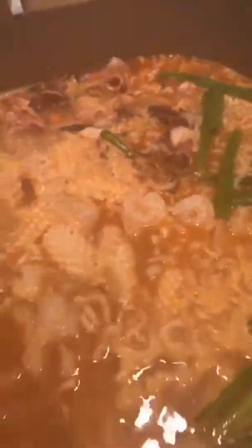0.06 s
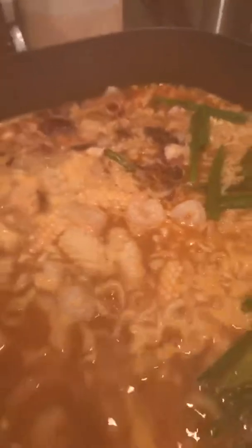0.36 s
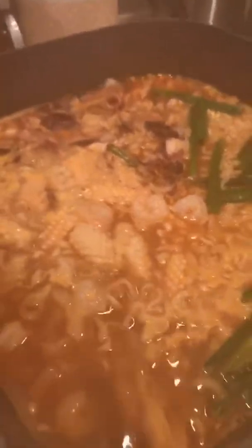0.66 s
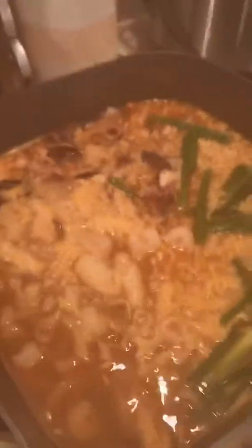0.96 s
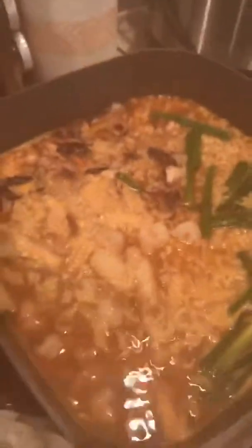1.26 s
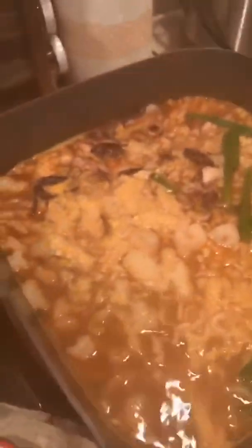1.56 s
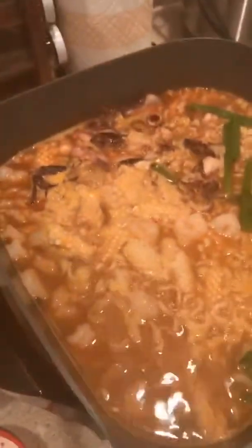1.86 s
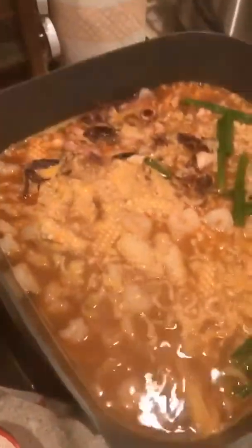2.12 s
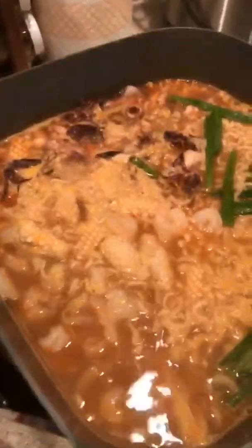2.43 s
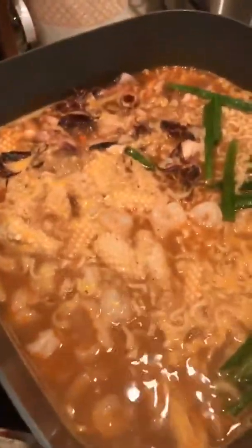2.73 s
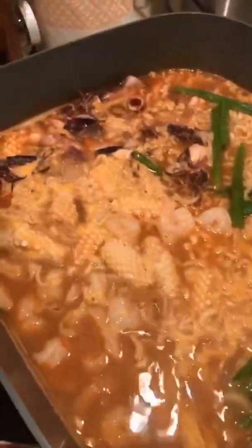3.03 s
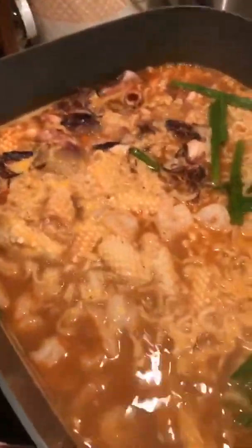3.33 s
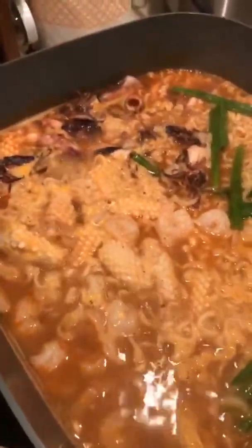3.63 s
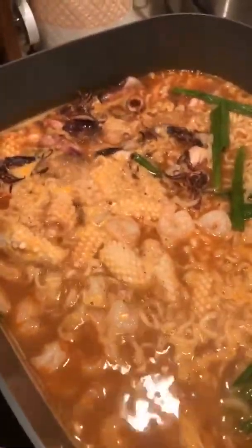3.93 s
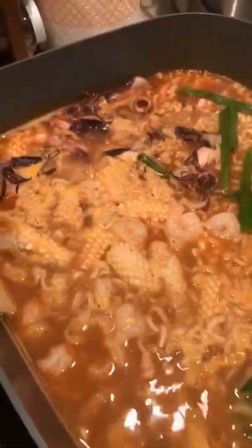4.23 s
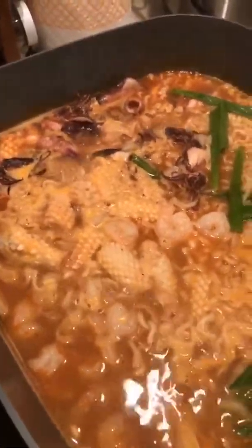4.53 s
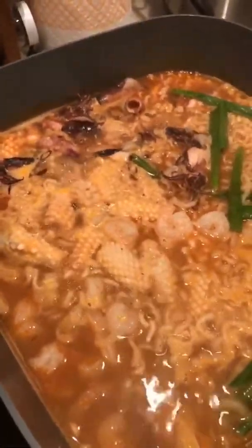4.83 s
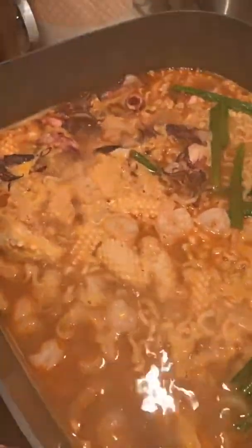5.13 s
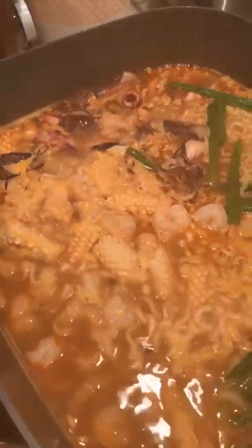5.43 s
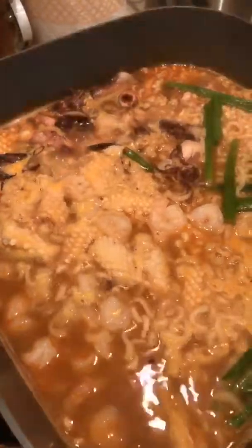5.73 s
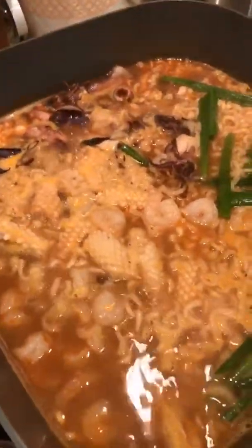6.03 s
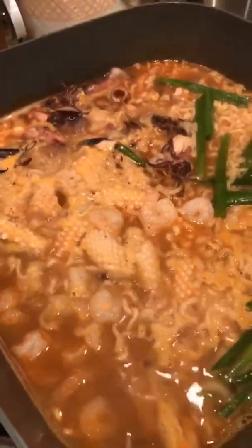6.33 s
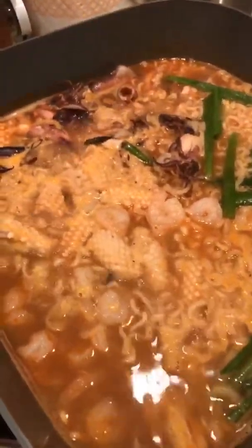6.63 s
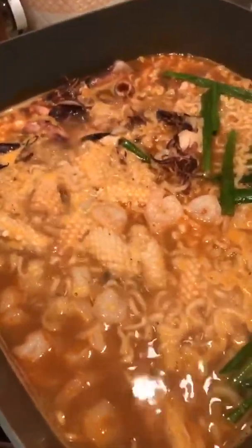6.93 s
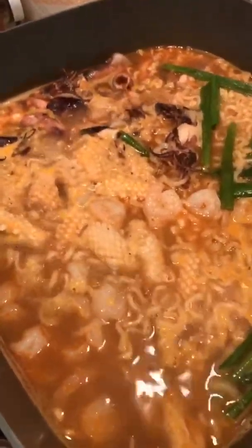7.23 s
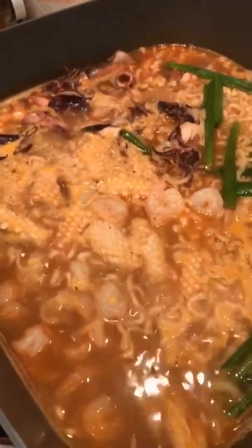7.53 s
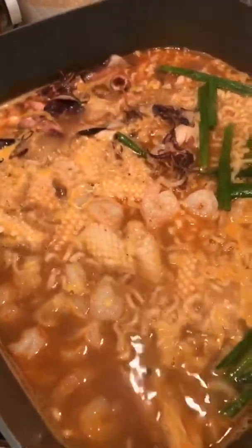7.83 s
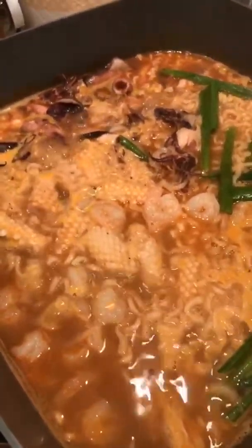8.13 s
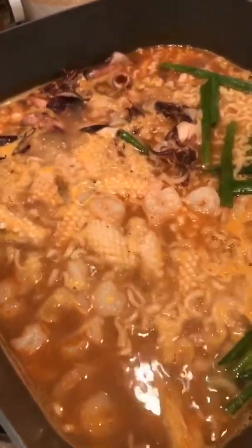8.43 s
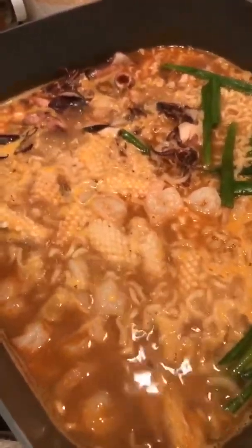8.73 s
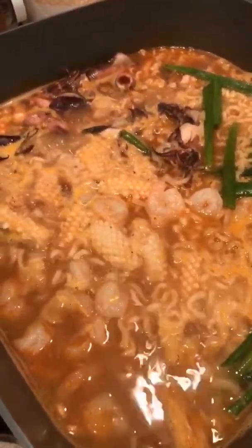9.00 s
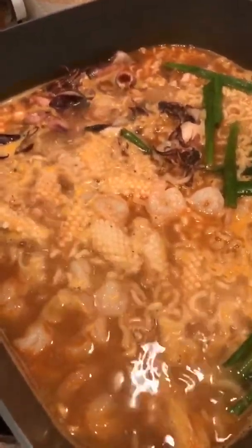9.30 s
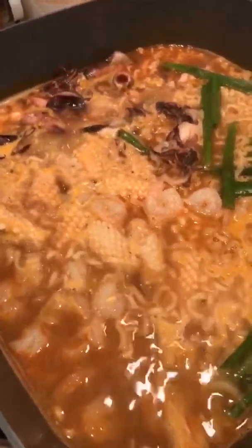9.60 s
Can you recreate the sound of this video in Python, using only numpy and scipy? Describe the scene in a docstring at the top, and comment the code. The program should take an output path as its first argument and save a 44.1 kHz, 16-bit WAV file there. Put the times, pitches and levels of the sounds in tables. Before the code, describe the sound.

Noodle soup simmers in a pan for the whole ten seconds, heard from just above it in a kitchen with little echo. Countless tiny bubbles burst in a fine, wet crackle over a soft hiss, with small plops and bright spitting ticks scattered irregularly throughout. Underneath, an extractor fan gives a steady low hum and a faint rush of air. At about 1 second a hand bumps the microphone: a loud, deep, dull thump made of several quick knocks, by far the loudest sound, dying away in a low rumble by about 1.6 seconds. The simmering continues at an even level. A tiny sizzle comes at around 2.3 seconds, a faint low bump at about 3.3 seconds, and a small sharp pop of steam near 7.8 seconds. The bubbling and the fan carry on unchanged to the end.

```python
"""Noodle soup simmers in a pan, heard from a hand-held camera just above it.
Countless small bubbles burst over a soft hiss; larger ones plop, and now and then a drop spits or sizzles.
About a second in, the hand shifts its grip and bumps the camera with a loud, dull thump; the camera
rocks to rest. Behind it all an extractor fan hums, its air rushing through the hood."""
import sys
import numpy as np
from scipy import signal
from scipy.fft import rfft, irfft, next_fast_len
from scipy.io import wavfile

SR = 44100
rng = np.random.default_rng(int(sys.argv[2]) if len(sys.argv) > 2 else 0)


def file_out(sig):
    """Save sig as 16-bit WAV at sys.argv[1]."""
    # one column per channel
    cols = np.atleast_2d(sig).T
    # limit, then scale
    lim = np.clip(cols, -1, 1)
    pcm = np.round(lim * 32767).astype(np.int16)
    wavfile.write(sys.argv[1], SR, pcm)


N = 434826
TIME = np.arange(N) / SR

# Crowds of bubbles, large to tiny. Each row: pitch in Hz, bursts a second, level in dB.
BUBBLE_CROWDS = [(1058, 82, -69), (1680, 270, -62), (3210, 400, -63), (4460, 170, -68), (5800, 110, -74.5),
                 (9200, 200, -83), (13800, 340, -72.5)]
# Hiss of the finest bubbles. Each row: frequency in Hz, level in dB.
HISS_SPECTRUM = [(500, -20), (1100, 3), (1700, 7), (2500, 0.5), (3300, 3.5), (4200, 1), (5000, -5),
                 (6000, -1.5), (7200, -10.5), (10000, -11.5), (11000, -49), (15000, -28)]
# Strength of the boil. Each row: time in seconds, gain in dB.
BOIL_RIDE = [(0, 1), (.85, -2), (1.15, -1.3), (2, -2), (4, -0.5), (8.7, -1.9), (9.86, -0.5)]
# Big bubbles and deep, slow ones. Each row: start in seconds, level in dB, pitch in Hz, cycles to the crest.
PLOP_CUES = [(0.7199, -37, 4290, .8), (0.882, -45, 3810, 0.99), (1.0179, -34.5, 3050, 1.9),
             (1.6723, -33, 3580, 1.5), (1.831, -45, 1660, 1.2), (1.956, -33, 1300, 0.44),
             (2.208, -38, 3030, 1.4), (2.267, -41, 2830, 1.6), (2.4073, -37, 1780, 0.77),
             (2.5123, -38, 2010, 1.2), (2.5745, -42, 2670, 1.9), (2.6173, -32.5, 1920, 0.77),
             (2.706, -41, 1690, 1.2), (2.716, -45, 3500, 1.8), (2.952, -35.5, 2150, .9),
             (3.008, -37, 1890, 1.8), (3.3667, -40, 3960, 1.4), (3.4445, -37, 2980, 1.1),
             (3.4714, -36.5, 1400, 1.5), (3.843, -34.5, 2900, 2.2), (3.963, -33, 2100, 0.74),
             (4.2845, -34.5, 2920, 0.91), (4.385, -39, 1630, 0.9), (4.43, -46, 1670, .8),
             (4.4838, -47, 1490, .8), (4.507, -39.5, 3800, 1.8), (4.561, -40, 1940, 1.8),
             (4.692, -39, 2830, 1.6), (4.752, -38, 1710, .9), (5.094, -36, 3400, 1.3),
             (5.438, -39, 1660, 1.2), (5.664, -32.5, 1930, 0.57), (6.0252, -39, 1880, 1),
             (6.213, -42, 1720, 1.3), (6.293, -41, 1880, 0.92), (6.554, -37, 1860, 0.71),
             (6.6028, -35, 4070, 1.3), (6.636, -35, 2010, 1.1), (6.662, -36.5, 3340, 1.1),
             (6.7307, -35.5, 1950, 2.1), (7.042, -38, 1530, 0.49), (7.057, -34.5, 3870, 1.2),
             (7.207, -36, 3470, 0.81), (7.2555, -33.5, 2920, 1.1), (7.4853, -36, 3250, 1),
             (7.692, -30, 3320, 1.3), (7.8679, -31.5, 2980, 1.5), (7.977, -31.5, 3830, 1),
             (8.584, -39, 1900, 1.7), (8.6465, -38, 1740, .6), (8.7745, -34, 3550, .9),
             (8.839, -35.5, 3450, 1.3), (9.063, -36, 1540, 0.81), (9.4553, -37, 3340, 1.2),
             (9.557, -32, 1910, .6), (9.6264, -43, 3290, 1.3), (9.749, -40, 2930, 2.7),
             (9.767, -34, 1460, 1.9)]
BLUP_CUES = [(1.955, -54, 884, 1.4), (3.085, -55, 605, 1.2), (3.469, -45, 910, 1.3),
             (4.253, -43, 696, 0.89), (5.323, -44, 633, 1)]
# Spitting drops. Each row: start in seconds, level in dB, centre of the tick's colour in Hz.
SPIT_CUES = [(1.065, -39, 9000), (1.6077, -45, 8000), (1.6631, -43, 8600), (1.693, -42, 8400),
             (1.732, -38, 8500), (1.8357, -42, 10000), (2.14, -39.5, 9000), (2.2194, -34, 8500),
             (2.5616, -45, 11000), (2.6194, -41, 13000), (2.9447, -42, 13000), (3.4321, -48, 11000),
             (3.83, -32.5, 9500), (3.9659, -40, 11000), (4.0297, -44, 11000), (4.2845, -49, 5500),
             (4.6548, -44, 13000), (4.7435, -40, 12500), (4.8204, -39, 12000), (4.935, -42, 13000),
             (5.0868, -43, 8000), (5.0945, -43, 7000), (5.2809, -41, 10000), (5.2994, -40, 11000),
             (5.9878, -46, 11000), (6.3964, -44, 7960), (6.5535, -42, 11000), (6.9386, -42, 12500),
             (6.9541, -37, 11500), (7.2569, -51, 14000), (7.6962, -39, 13000), (7.856, -39, 9000),
             (8.6457, -33.5, 9500), (8.6697, -39, 11000), (8.839, -50, 5500), (9.1775, -43, 11000),
             (9.319, -38, 9400), (9.4544, -43, 11000), (9.511, -39, 12500), (9.558, -50, 5000),
             (9.6405, -40, 11000)]
# Colour of spits and spray. Each row: frequency in Hz, level in dB.
SPIT_SPECTRUM = [(1500, -25), (4000, 6), (6500, 4.5), (9000, 0), (12000, -0.5), (15500, 2.5)]
# Collapsing froth. Each row: start in seconds, level in dB.
FIZZ_CUES = [(0.786, -61), (.817, -54), (.868, -55.5), (6.634, -60), (7.045, -61), (7.204, -62)]
# Steam off hot metal. Each row: frequency in Hz, level in dB.
STEAM_SPECTRUM = [(300, -4), (700, 0), (1200, 0), (2000, 0), (3500, 0), (6000, -3), (9000, -5), (15000, -5)]
# The pan wall rings under a sizzle and a pop. Each row: pitch in Hz, level in dB, seconds to fall 60 dB.
WALL_SIZZLE_MODES = [(1120, -46, .045), (1405, -43, .06), (3800, -48, .09), (4301, -49, .1),
                     (7150, -49, .1)]
WALL_POP_MODES = [(1930, -27.5, 0.0082), (2920, -21, 0.0021), (2950, -48, .05), (3930, -29, 0.0028),
                  (5660, -31, 0.0065), (11800, -30.5, 0.0032), (14800, -30, 0.0029)]
# Resonances of the air in the pan. Each row: centre in Hz, width in Hz, gain of the added band in dB.
PAN_RESONANCES = [(936, 114, 2), (1740, 1500, -13), (3150, 400, -8.5), (4270, 170, -15)]
# The hand bumps the camera.
# Each row: start in seconds, boom level in dB, boom pitch in Hz, thud gain in dB, knock gain in dB.
BUMP_CUES = [(1.044, -37, 60, -29, -42), (1.0522, -10, 24, -14, -18), (1.0793, -7, 55, -12.5, -28),
             (1.0963, -5, 48, -22, -44), (1.1115, -9, 47, -10, -10), (1.1316, -31, 41.8, -15, -13),
             (1.139, -32, 42, -11, -28), (1.1498, -12.5, 47, -9.5, -15), (1.1747, -14, 66, -16.5, -19.5),
             (1.2045, -30, 68, -25, -41), (1.2329, -19, 85, -16.5, -22), (1.2484, -39, 65, -24, -29),
             (1.2666, -18, 62, -17, -30), (1.2833, -19, 55, -23, -30), (1.3303, -15.5, 56.8, -30, -56),
             (1.388, -31, 50.4, -38, -70), (1.526, -27, 49.7, -46, -70), (3.29, -32, 53.7, -54, -66)]
# The camera's body thuds, its shell knocks. Each row: pitch in Hz, level in dB, seconds to fall 60 dB.
BODY_MODES = [(105, -4.5, 0.089), (135, -3.5, 0.16), (168, -4, .075), (206.5, -4, 0.076), (327, -7, 0.08)]
SHELL_MODES = [(488, -0.5, 0.014), (745, -10, 0.018), (982, -7.5, .014), (1206, -9, 0.01),
               (1670, -15.5, 0.0066)]
# Skin scuffing the shell. Each row: frequency in Hz, level in dB.
SCUFF_SPECTRUM = [(150, -9), (400, 5), (700, 4), (1050, -4.5), (1500, -16), (2200, -29), (4000, -64)]
# The camera's move over the pan. Each row: time in seconds, gain of the wall's echo, treble gain in dB.
CAMERA_PATH = [(0, 0.099, -1.5), (.5, 0.41, 0), (.85, 0.19, 2), (1.08, 0, -1.5), (1.5, 0.016, -1.5),
               (1.68, 0.035, 0.5), (9.86, .04, -0.26)]
# Hum of the fan. Each row: multiple of the motor speed, level in dB.
MOTOR_HARMONICS = [(1, -38), (5, -57), (6, -56.5), (7, -52), (8, -85), (9, -66.5), (10, -67), (11, -66.5),
                   (14, -76), (18, -73.5)]
# Rush of the fan's air. Each row: frequency in Hz, level in dB.
AIR_SPECTRUM = [(15, -16), (45, 3), (95, 2), (140, -7.5), (210, -2.5), (300, -2), (400, -6.5), (470, -5),
                (560, -11), (730, -12), (930, -10.5), (1250, -21), (2500, -21.5), (8000, -40)]
# Drone of the hood, stirred by the air. Each row: centre in Hz, width in Hz, level in dB.
HOOD_RESONANCES = [(30, 13, -52.5), (244.2, 10.5, -62), (282, 8, -56), (365.6, 16, -61), (665, 16, -70.5)]
# The kitchen's tail. Each row: frequency in Hz, seconds to fall 60 dB.
KITCHEN_DECAY = [(200, 0.18), (2000, 0.26), (6000, 0.076), (15000, 0.18)]


def simmer(spread_db=5.0, clump=.3, hiss_db=-60, flicker_db=2.57):
    """Bubbles of every size burst in clumps over a flickering hiss; a few are much louder than the rest."""
    surge = drift(35)
    busy = np.exp(clump * surge)
    out = gain_of(hiss_db + flicker_db * surge) * coloured(HISS_SPECTRUM)
    for hz, per_s, db in BUBBLE_CROWDS:
        crowd = np.zeros(N)
        # thick broth damps each ring within a few cycles
        rings = [bubble(hz * np.exp(rng.uniform(-.25, .25)), rng.uniform(.5, 1.5)) for _ in range(48)]
        when, size, kind = rng.random((7000, 3))[:int(per_s * N / SR)].T
        starts = np.searchsorted(np.cumsum(busy) / busy.sum(), when) / SR
        heights = gain_of(spread_db * np.minimum(-np.log(1 - size), 3.8))
        for s, height, pick in zip(starts, heights, kind):
            add(crowd, s, height * rings[int(pick * len(rings))])
        out += gain_of(db) * unit_rms(crowd)
    return out * gain_of(curve(BOIL_RIDE)[0])


def bubble(hz, cycles, glide=0.035):
    """A bursting bubble's cavity swells into a short ring, rising a little as it opens."""
    turns = hz * TIME[:1500]
    age = turns / max(cycles, .3)
    swell = (age * np.exp(1 - age)) ** 1.4
    return swell * np.sin(2 * np.pi * turns * (1 + glide * np.tanh(age / 6)))


def plops(plop_db=-2.5, splash_db=-18, daughter_db=-11, daughter_s=.012):
    """Large bubbles plop, their torn skin splashes back and traps a smaller bubble; deep ones blup."""
    out = np.zeros(N)
    for s, db, hz, cycles in PLOP_CUES:
        add(out, s, gain_of(db + plop_db) * bubble(hz, cycles))
        add(out, s, gain_of(db + splash_db) * puff(HISS_SPECTRUM, 0.00082, 0.0032))
        delay, pitch = rng.random(2)
        daughter = bubble(hz * (1.15 + .6 * pitch), cycles)
        add(out, s + daughter_s * delay, gain_of(db + daughter_db) * daughter)
    for s, db, hz, cycles in BLUP_CUES:
        add(out, s, gain_of(db) * bubble(hz, cycles))
    return out


def spits(spit_db=-8.0, rise_s=0.00094, fall_s=0.0014, focus_db=9, droplet_db=-11, scatter_s=.028):
    """Each drop spits with a bright tick, pitched by its size, and three droplets spatter after it."""
    out = np.zeros(N)
    for s, db, hz in SPIT_CUES:
        colour = [(f, level - focus_db * np.log2(f / hz) ** 2) for f, level in SPIT_SPECTRUM]
        add(out, s, gain_of(db + spit_db) * puff(colour, rise_s, fall_s))
        for delay, size in rng.random((3, 2)):
            droplet = 2 * size * puff(colour, rise_s / 2, fall_s / 2)
            add(out, s + scatter_s * delay, gain_of(db + spit_db + droplet_db) * droplet)
    return out


def spray(db=-71, per_s=45, spread_db=12.5):
    """A fine spray from the bursting bubbles ticks faintly across the whole treble."""
    when, size = rng.random((2000, 2))[:int(per_s * N / SR)].T
    drops = np.zeros(N)
    drops[(when * N).astype(int)] = gain_of(spread_db * np.minimum(-np.log(1 - size), 3))
    tick = strike(TIME[:1000], rise_s=0.0012, fall_s=0.0042)
    envelope = signal.oaconvolve(drops, tick)[:N]
    return gain_of(db + curve(BOIL_RIDE)[0]) * unit_rms(envelope * coloured(SPIT_SPECTRUM))


def fizzes(hz=4000, length_s=.017, count=8):
    """A patch of froth collapses: a handful of like bubbles burst almost together."""
    out = np.zeros(N)
    for s, db in FIZZ_CUES:
        patch = np.zeros(3000)
        for when, pitch in rng.random((count, 2)):
            add(patch, when * length_s, bubble(hz * (.85 + .3 * pitch), cycles=1.6))
        add(out, s, gain_of(db) * patch / np.linalg.norm(patch) * np.sqrt(length_s * SR))
    return out


def sizzle(start_s=2.2767, db=-41.0, grain_db=1.5):
    """A splash rings the hot wall and boils away in a crackling blink."""
    out = np.zeros(N)
    steam = puff(STEAM_SPECTRUM, rise_s=.001, fall_s=0.018)
    crackle = unit_rms(gain_of(grain_db * drift(400, len(steam))))
    wall = ring(WALL_SIZZLE_MODES, contact_s=.0005, size=len(steam))
    add(out, start_s, gain_of(db) * steam * crackle + wall)
    return out


def pop(start_s=7.7537, low_cut_hz=1400):
    """One pocket of steam snaps against the pan; it is too small to radiate any bass."""
    out = np.zeros(N)
    low_cut = signal.butter(3, low_cut_hz, "high", fs=SR, output="sos")
    add(out, start_s, signal.sosfilt(low_cut, ring(WALL_POP_MODES, contact_s=.00003)))
    return out


def pan(x, trim_db=-2):
    """The hollow of the pan lifts a few bands of the soup's sound."""
    bands = sum(gain_of(db) * signal.lfilter(*signal.iirpeak(hz, hz / width, fs=SR), x)
                for hz, width, db in PAN_RESONANCES)
    return gain_of(trim_db) * (x + bands)


def handling(scuff_db=-17, rock_start_s=1, rock_hz=43.24, rock_db=-21.5, rock_t60_s=2):
    """Each bump swings the camera, thuds its body, knocks and scuffs its shell; then it rocks to rest."""
    out, swing = np.zeros(N), np.zeros(N)
    thud = ring(BODY_MODES, contact_s=0.0013)
    knock = ring(SHELL_MODES, contact_s=0.00078)
    for s, boom_db, _, thud_db, knock_db in BUMP_CUES:
        add(swing, s, gain_of(boom_db) * strike(TIME[:SR // 2], rise_s=0.0044, fall_s=0.016))
        add(out, s, gain_of(thud_db) * thud + gain_of(knock_db) * knock)
        add(out, s, gain_of(knock_db + scuff_db) * puff(SCUFF_SPECTRUM, 0.0013, 0.016))
    # the rocking is one deep ring that beats against the fan's hum
    add(out, rock_start_s, ring([(rock_hz, rock_db, rock_t60_s)], contact_s=.03, size=SR))
    boom_hz = curve(BUMP_CUES)[1]
    boom = swing * np.sin(2 * np.pi * np.cumsum(boom_hz * (swing > 0)) / SR)
    return out + boom


def fan(motor_hz=58.36, waver=0.00071, flutter=0.17, air_db=-49):
    """Motor tones, the upper ones fluttering in the draught, over rushing air and a droning hood."""
    turns = np.cumsum(motor_hz * (1 + waver * drift(1.55))) / SR
    out = gain_of(air_db) * coloured(AIR_SPECTRUM)
    for multiple, db in MOTOR_HARMONICS:
        sway = 1 + flutter * drift(2.7) if multiple > 2 else 1
        tone = np.sin(2 * np.pi * (multiple * turns + rng.random()))
        out += np.sqrt(2) * gain_of(db) * sway * tone
    for centre, width, db in HOOD_RESONANCES:
        out += gain_of(db) * noise(lambda hz: 1 / (1 + (2 * (hz - centre) / width) ** 2))
    return out


def over_pan(x, echo_s=0.00022, rim_hz=2500, wall_hz=5000):
    """The wall's echo hollows the sound while the camera is low; the rim dulls it as it pulls back."""
    echo, treble_db = curve(CAMERA_PATH)
    reflected = signal.sosfilt(signal.butter(1, [200, wall_hz], "band", fs=SR, output="sos"), x)
    x = x + echo * np.interp(TIME - echo_s, TIME, reflected)
    low = signal.sosfiltfilt(signal.butter(2, rim_hz, fs=SR, output="sos"), x)
    return low + gain_of(treble_db) * (x - low)


def kitchen(x, wet_db=-9.5, near_gain=.25, echoes_per_s=3000):
    """Six close echoes off the pan and hob, then a short, faint tail that lingers most in the mids."""
    size = SR // 2
    taps = rng.choice([-1., 1.], size) * (rng.random(size) < echoes_per_s / SR) * (TIME[:size] > .004)
    hz, t, spectra = signal.stft(taps, SR, nperseg=256)
    decay = np.exp(-np.log(1000) * t / value_at(KITCHEN_DECAY, hz)[:, None])
    tail = signal.istft(spectra * decay, SR, nperseg=256)[1]
    response = gain_of(wet_db) * tail / np.linalg.norm(tail)
    response[rng.integers(30, 260, size=6)] += near_gain / np.sqrt(6) * rng.choice([-1., 1.], size=6)
    return x + signal.oaconvolve(x, response)[:N]


def ring(modes, contact_s, size=12000):
    """Modes set ringing by a blow that takes contact_s to build."""
    t = TIME[:size]
    tones = sum(gain_of(db) * np.exp(-np.log(1000) * t / t60) * np.sin(2 * np.pi * hz * t)
                for hz, db, t60 in modes)
    return (1 - np.exp(-(t / contact_s) ** 2)) * tones


def puff(points, rise_s, fall_s):
    """A short burst of coloured noise, of rms about 1 at its crest."""
    size = min(9000, 400 + int(10 * fall_s * SR))
    envelope = strike(TIME[:size], rise_s, fall_s)
    sound = envelope * coloured(points, size)
    return sound * np.linalg.norm(envelope) / np.linalg.norm(sound)


def strike(t, rise_s, fall_s):
    """Envelope of height 1 with a quick attack and an exponential decay."""
    shape = (1 - np.exp(-(t / rise_s) ** 2)) * np.exp(-t / fall_s)
    return shape / shape.max()


def noise(shape, size=N):
    """Noise of rms 1 whose amplitude spectrum is shape(Hz)."""
    length = next_fast_len(size, True)
    spectrum = rfft(rng.standard_normal(length)) * shape(np.fft.rfftfreq(length, 1 / SR))
    return unit_rms(irfft(spectrum, length)[:size])


def coloured(points, size=N):
    """Noise with a spectrum given in dB."""
    return noise(lambda hz: gain_of(value_at(points, hz)), size)


def drift(rate_hz, size=N):
    """A random wobble of rms 1, rolling off above rate_hz."""
    return noise(lambda hz: 1 / (1 + (hz / rate_hz) ** 4), size)


def value_at(points, hz):
    """Reads a table on a log-frequency axis."""
    f, value = np.transpose(points)
    return np.interp(np.log(hz + 1), np.log(f + 1), value)


def curve(rows):
    """Each column of a time table, at every sample."""
    s, *columns = np.transpose(rows)
    return [np.interp(TIME, s, column) for column in columns]


def add(mix, s, sound):
    """Mixes a sound in at s seconds."""
    part = mix[max(round(s * SR), 0):][:len(sound)]
    part += sound[:len(part)]


def gain_of(db):
    """Decibels to amplitude."""
    return 10 ** (np.asarray(db) / 20)


def unit_rms(x):
    """Scales to rms 1."""
    return x / np.sqrt(np.mean(x ** 2) + 1e-20)


def scene():
    """Soup and fan arrive through the air, the bumps through the camera body."""
    bubbling = simmer() + spray() + plops() + spits() + fizzes() + sizzle()
    soup = kitchen(pan(bubbling) + pop())
    return (over_pan(soup + fan()) + handling())[None]


def record(dry, high_cut_hz=15900):
    """A steep high cut takes off the very top."""
    high_cut = signal.firwin(511, high_cut_hz, window=("kaiser", 9), fs=SR)
    return signal.oaconvolve(dry, high_cut[None], "same")


dry = scene()
out = record(dry)
file_out(out)
```